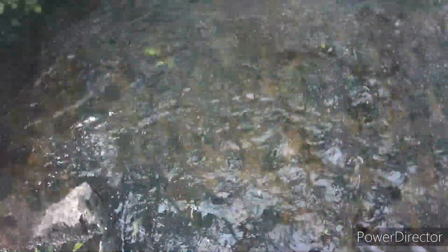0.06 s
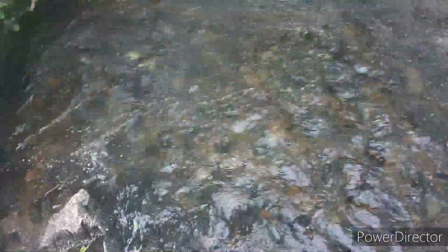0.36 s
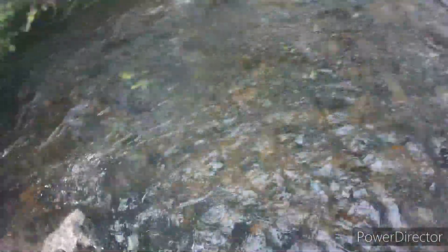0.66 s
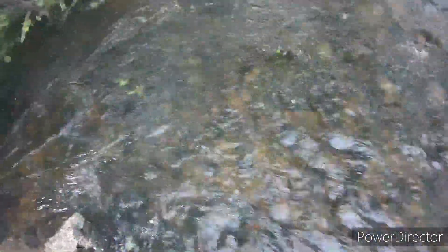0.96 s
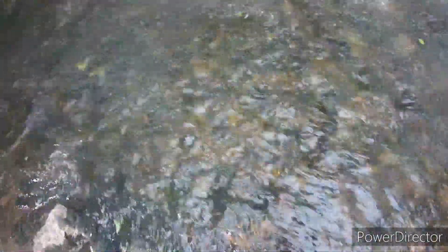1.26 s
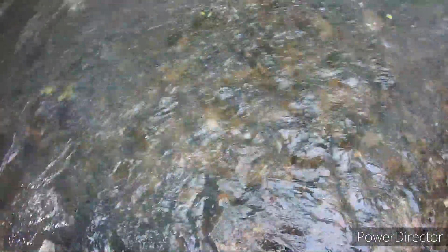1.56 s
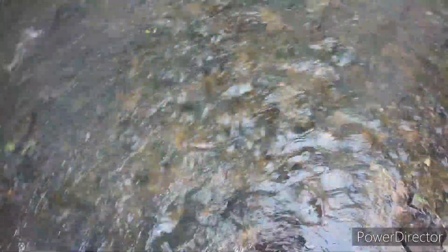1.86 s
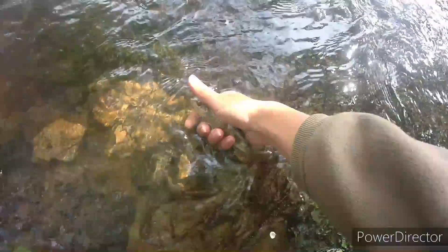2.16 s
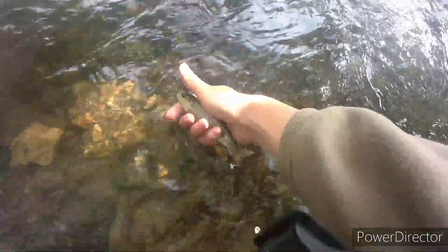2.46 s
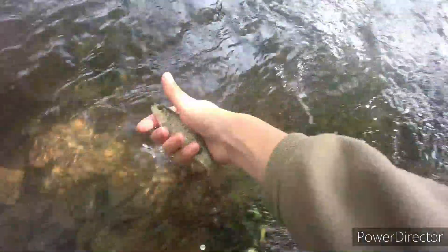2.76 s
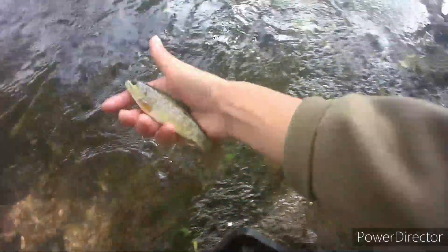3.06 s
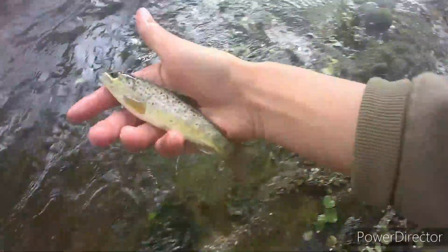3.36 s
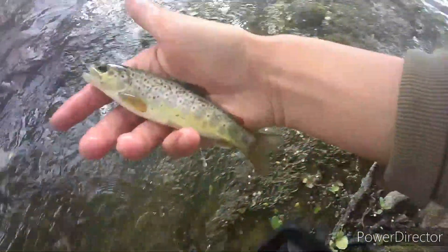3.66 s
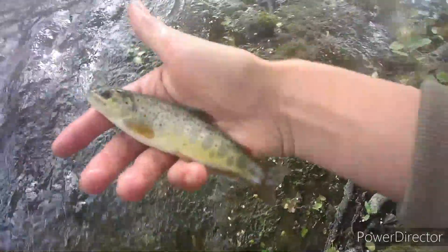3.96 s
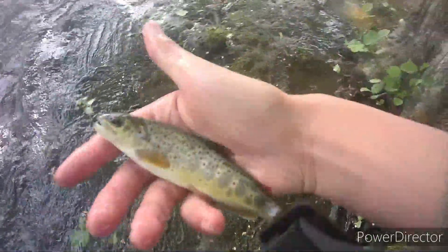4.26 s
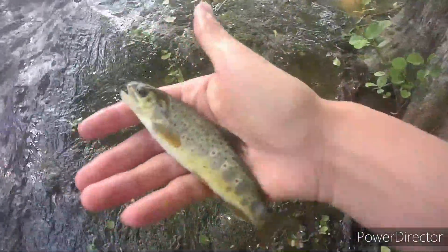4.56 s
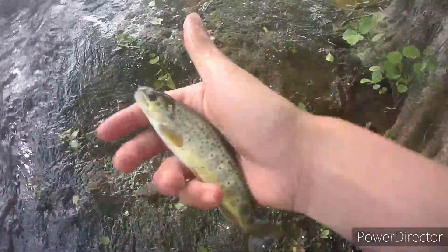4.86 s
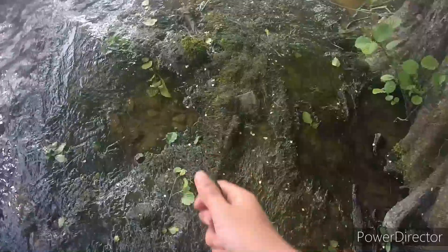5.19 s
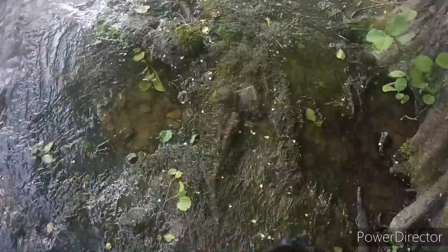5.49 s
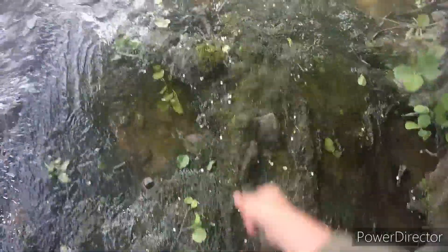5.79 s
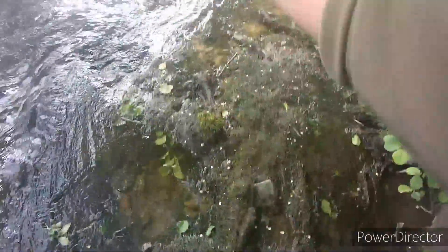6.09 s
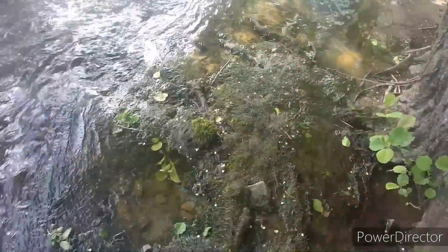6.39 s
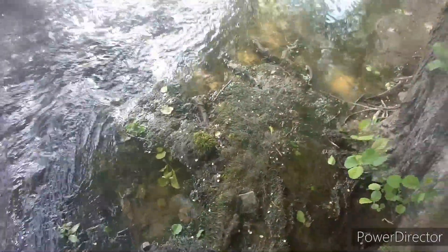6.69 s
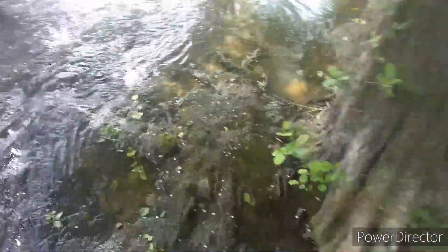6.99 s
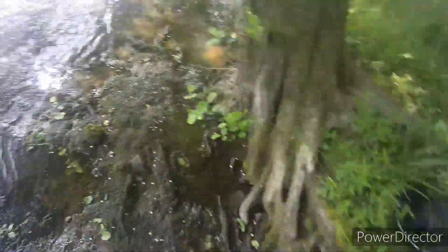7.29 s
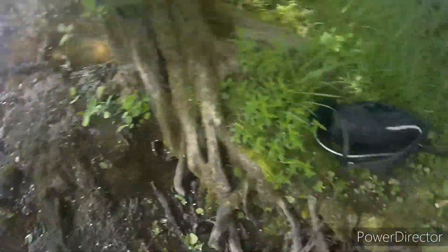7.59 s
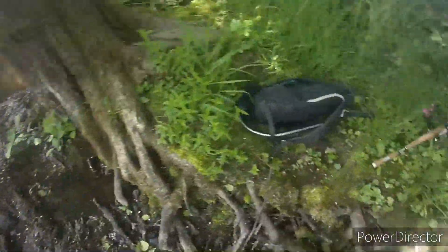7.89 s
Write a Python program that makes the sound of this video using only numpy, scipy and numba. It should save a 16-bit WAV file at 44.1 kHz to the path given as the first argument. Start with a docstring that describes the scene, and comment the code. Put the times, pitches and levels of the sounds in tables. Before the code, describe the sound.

Loud, close knocks and fabric scrapes hit the plastic case of a body-worn microphone, briefly overloading it, while a small buckle rings twice over a low rumble. Behind them a shallow stream runs softly over stones. After a very short dropout, the water continues for several seconds with occasional light brushes of cloth, until another burst of bumps and rubbing closes the scene.

```python
"""A shallow stream runs over stones, heard from a body-worn camera in a plastic case. From the start
the swaying mount rumbles under the water, beside a faint electronic whine. In the first second or so
clothing rubs the case, gear knocks on it and overloads the microphone, and a buckle rings twice.
Just after 2 s the sound drops out briefly. Water and light rubbing follow, until hard knocks and
louder rubbing return from about 7.4 s."""
import sys
import numpy as np
from scipy import signal
from scipy.fft import rfft, irfft, next_fast_len
from scipy.io import wavfile
from scipy.ndimage import uniform_filter1d
from numba import njit

SR = 44100
rng = np.random.default_rng(int(sys.argv[2]) if len(sys.argv) > 2 else 0)


def transcribe(signal):
    """Save signal, clipped to [-1, 1], as a 16-bit WAV file at the path in sys.argv[1]."""
    frames = np.atleast_2d(signal).T
    limited = np.clip(frames, -1, 1)
    pcm = np.round(limited * 32767).astype(np.int16)
    wavfile.write(sys.argv[1], SR, pcm)


N = 358974
TIME = np.arange(N) / SR


def undb(db):
    """Amplitude ratio of a level in decibels."""
    return 10 ** (np.asarray(db) / 20)


def unit(x):
    """Normalisation to rms 1."""
    return x / np.sqrt(np.mean(x ** 2))


def add(out, start_s, x):
    """Superposition: x is added to out from start_s on."""
    i = max(int(start_s * SR), 0)
    out[i:i + len(x)] += x[:max(len(out) - i, 0)]


def colour(x, outline, tilt_db=0):
    """Spectral shaping by an outline (f/Hz, level/dB) and a tilt per octave; rms 1."""
    size = next_fast_len(len(x))
    octave = np.log2(np.maximum(np.fft.rfftfreq(size, 1 / SR), 1))
    hz, db = np.transpose(outline)
    gain = undb(np.interp(octave, np.log2(hz), db) + tilt_db * np.maximum(octave, np.log2(hz[0])))
    return unit(irfft(rfft(x, size) * gain, size)[:len(x)])


def fluctuation(rate):
    """Random modulation: values held for 1 / rate seconds and smoothed twice; rms 1."""
    hold = max(int(SR / rate), 1)
    steps = np.repeat(rng.standard_normal(N // hold + 1), hold)
    return unit(uniform_filter1d(uniform_filter1d(steps, hold), hold)[:N])


def ring(t, hz, t60):
    """Damped oscillation: a sine that falls by 60 dB in t60 seconds."""
    return np.sin(2 * np.pi * hz * t) * np.exp(-np.log(1000) * t / t60)


def clicks(rate, spread_db):
    """Shot noise: on average rate impulses a second, many small and a few large."""
    size = undb(spread_db * np.minimum(rng.exponential(size=N), 5))
    return unit((rng.random(N) < rate / SR) * size * rng.standard_normal(N))


def bubbles(count, low_hz, high_hz, cycles, glide, spread_db):
    """Bubble resonance: trapped air rings briefly and rises in pitch as it nears the surface."""
    out = np.zeros(N)
    for when, pitch, size, life in rng.random((count, 4)):
        hz = low_hz * (high_hz / low_hz) ** pitch
        t60 = cycles * (.5 + life) / hz
        t = TIME[:int(t60 * SR)]
        chirp = ring(t, hz * (1 + glide * t / t60), t60)
        add(out, when * N / SR, undb(-spread_db * np.log(size + .01)) * chirp)
    return unit(out)


def stream():
    """Dense fizz and separate bubbles are filtered by the cavity resonances of the case."""
    # spectrum of the rushing water: f/Hz, spectral level/dB
    rush = [(100, -10.5), (200, -6), (400, -8.5), (700, -7.5), (1020, -1), (1280, -13.5), (1800, -7.5),
            (2600, -19.5), (3200, -15.5), (4300, -21), (7000, -27), (9000, -26), (12000, -33.5),
            (15000, -38.5)]
    # nearness of the riffle: t/s, level/dB, half the treble gain/dB
    riffle = [(0, -46.5, -2), (2.1, -48.5, 0.5), (2.3, -47, 0.5), (3.5, -48, 1), (4.6, -49, 1.5),
              (5.8, -47, 0), (6.8, -48, 0), (7.4, -48.5, 0), (8.14, -40, -5)]
    times, db, half_treble_db = np.transpose(riffle)
    fizz = colour(clicks(rate=9000, spread_db=0.5), rush) * undb(0.9 * fluctuation(rate=14))
    gurgle = bubbles(count=3500, low_hz=422, high_hz=7000, cycles=31, glide=0.063, spread_db=3.0)
    water = unit(fizz + undb(-4) * colour(gurgle, rush, tilt_db=5.0))
    treble = signal.sosfilt(signal.butter(1, 2500, "high", fs=SR, output="sos"), water)
    treble_gain = undb(2 * np.interp(TIME, times, half_treble_db))
    return (water + (treble_gain - 1) * treble) * undb(np.interp(TIME, times, db))


def sway(lift_db=2, uneven_db=2):
    """Structure-borne sound: body movement reaches the microphone through the mount as a rumble."""
    # strength of the sway: t/s, level before the lift/dB
    movement = [(0.0, -54), (0.34, -45.5), (0.88, -34.5), (2.02, -46), (2.13, -51), (2.47, -55),
                (6.87, -50.5), (7.62, -44), (7.8, -38), (8.14, -51)]
    # spectrum of the rumble: f/Hz, spectral level/dB
    spectrum = [(15, -19.5), (35, 1), (55, -1.5), (90, -4), (140, -13.5), (260, -25), (500, -55.5)]
    times, db = np.transpose(movement)
    rumble = colour(rng.standard_normal(N), spectrum)
    return rumble * undb(np.interp(TIME, times, db) + lift_db + uneven_db * fluctuation(rate=12))


def whine(hz=14804, db=-94):
    """A steady electronic oscillation is heard as a faint pure tone."""
    return undb(db) * unit(np.sin(2 * np.pi * hz * TIME))


def cloth(catch_db=2.5):
    """Stick-slip friction: fibres catch and slip on the case in uneven strokes."""
    # strokes: onset t/s, duration/s, level/dB, tilt/(dB per octave), peak position/fraction of stroke
    strokes = [(0.065, 0.13, -38.5, -5, 0.64), (0.306, 0.12, -49, -1, 0.4), (0.502, 0.03, -27.5, -2, 0.25),
               (0.627, 0.039, -18.5, -2, 0.83), (0.751, 0.22, -34, -2.5, 0.64),
               (0.965, 0.11, -31.5, -3.5, .7), (1.055, 0.056, -21, -2, 0.63), (1.102, 0.084, -35, -2, .5),
               (1.194, 0.4, -43, -2, .5), (1.60, 0.072, -43.5, -1.5, .5), (1.843, 0.076, -44.5, 2.5, 0.57),
               (2.07, .08, -42.5, 0.5, 0.3), (2.303, .35, -47.5, -2, .5), (2.66, 0.2, -42, 0.5, 0.39),
               (3.137, 0.22, -45.5, -1, .55), (3.699, 0.17, -48, 2, .6), (4.094, 0.074, -37.5, -0.5, 0.24),
               (4.156, .10, -38.5, -1.5, 0.25), (4.178, 0.22, -48.5, 2, .2),
               (4.459, 0.25, -42.5, -0.5, 0.57), (4.592, 0.068, -39, -0.5, 0.65),
               (6.568, .14, -46.5, -1.5, .5), (6.752, 0.13, -42, -2, 0.42),
               (6.996, 0.16, -36.5, -0.5, 0.09), (7.399, 0.17, -36, -2, 0), (7.674, 0.1, -30.5, -2, 0.52),
               (7.757, .12, -31, -3, 0.44), (7.886, 0.066, -18, -1.5, 0.72), (7.945, .05, -36.5, 0.5, .3),
               (8.017, 0.14, -44, 1, 0.3)]
    # cloth heard through the case: f/Hz, spectral level/dB
    spectrum = [(100, -5.5), (350, -8), (600, -1), (1050, -3), (1300, -7), (1850, -3), (2500, -10),
                (3200, -10.5), (4300, -16), (5200, -25), (9500, -28), (15000, -39.5)]
    out = np.zeros(N)
    slips = clicks(rate=4500, spread_db=2) * undb(catch_db * fluctuation(rate=110))
    for start, length, db, tilt_db, peak in strokes:
        grain = slips[int(start * SR):int((start + length) * SR)]
        progress = np.arange(len(grain)) / (length * SR)
        speed = np.interp(progress, [0, np.clip(peak, .02, .98), 1], [0, 1, 0])
        add(out, start, undb(db) * np.sin(speed * np.pi / 2) * colour(grain, spectrum, tilt_db))
    return out


def knocks(crack_db=-13, crack_t60=0.022, thump_hz=48, thump_t60=0.082, reach_octaves=0.47):
    """Impact excitation: a blow rings the case modes, weighted by the spot struck, and jolts the mount."""
    # blows: t/s, level/dB, contact cutoff f/Hz, favoured f/Hz, its boost/dB, relative thump level/dB
    blows = [(0.0692, -14, 1700, 650, 1.5, -14.5), (0.4869, 4.5, 2300, 560, -1, -8),
             (0.5443, -1, 3800, 1850, 6, -16), (0.6555, -5.5, 4200, 1650, 7.5, -24),
             (0.7050, -21, 1500, 300, -4, 4), (0.7147, -13.5, 1800, 1050, 4.5, 9.5),
             (0.7770, -11.5, 2000, 1050, 6.5, -20), (0.8140, -22, 1500, 1000, 14, -14),
             (0.8820, -9, 1300, 1040, 8, -8), (0.895, -20, 1500, 650, 11, 1),
             (0.9052, -19.5, 2200, 1900, 8, 8), (0.9669, -19.5, 3800, 1310, 13, -4),
             (1.0330, -19.5, 1500, 605, 14, -11), (1.0602, -4, 1900, 810, 7, 1.5),
             (1.0816, -6, 1600, 810, 14.5, -3), (1.0985, 2, 3400, 2540, 6, -9),
             (1.1180, -27, 2600, 1500, 6, -9), (1.16, 6, 4000, 506, 4.5, -25),
             (1.188, -20, 1800, 1400, 0, -14), (1.2043, -18.5, 1100, 950, 18.5, -16),
             (1.9047, -8.5, 1300, 1010, 14.5, -17), (2.1390, -22, 1400, 974, 17, -9),
             (4.0964, -22.5, 1300, 560, 13, -22.5), (4.6110, -24.5, 6000, 1900, 2, -20),
             (7.3972, -6, 1600, 525, 14, -20.5), (7.6024, -6, 4000, 1820, 4.5, -17),
             (7.854, -7, 2700, 1010, 11, -20), (7.8636, -7, 3600, 3640, 12.5, -22),
             (7.8677, -6.5, 1400, 920, 17.5, -24), (7.9453, 2.5, 3200, 1490, 5.5, -5),
             (7.9790, 4, 5500, 760, 5.5, -31)]
    # modes of the case: f/Hz, level/dB, decay time T60/s
    case_modes = [(161, -12, 0.028), (325, -12.5, 0.027), (474, -16, 0.046), (615, -13.5, 0.031),
                  (810, -12.5, 0.031), (1000, -13, 0.034), (1400, -10.5, 0.015), (1700, -11, 0.019),
                  (1983, -12.5, .025), (2730, -12.5, 0.013), (3200, -12.5, 0.015), (4115, -15, 0.014),
                  (4830, -23.5, 0.0095), (5860, -14, 0.012), (7480, -12, 0.0086), (8880, -8.5, .008),
                  (11380, -11, .007)]
    out, t = np.zeros(N), TIME[:SR // 6]
    hz, mode_db, t60 = np.transpose(case_modes)
    modes = np.array([(-1) ** k * ring(t, hz[k], t60[k]) for k in range(len(hz))])
    for start, db, cutoff_hz, spot_hz, boost_db, thump_db in blows:
        spot_db = boost_db * np.exp(-(np.log2(hz / spot_hz) / reach_octaves) ** 2)
        ringing = undb(mode_db + spot_db) @ modes
        crack = undb(crack_db) * rng.standard_normal(len(t)) * np.exp(-np.log(1000) * t / crack_t60)
        thump = undb(thump_db) * ring(t, thump_hz, thump_t60)
        # a softer contact pushes for longer and leaves out the treble
        contact = signal.butter(2, cutoff_hz, fs=SR, output="sos")
        add(out, start, undb(db) * signal.sosfilt(contact, ringing + crack + thump))
    return out


def buckle():
    """Free vibration: a small metal part, struck or dragged, rings in its inharmonic modes."""
    # strikes: t/s, level/dB, build-up time/s, gain of the lowest mode/dB
    strikes = [(0.5450, -9, .002, -34), (0.6440, -7.5, .012, 4)]
    # modes of the buckle: f/Hz, level/dB, decay time T60/s
    modes = [(577, -1, .11), (1906, 0, 0.085), (2439, -27, .22), (2690, -16, 0.059), (3072, -29, 0.17)]
    out, t = np.zeros(N), TIME[:SR // 4]
    for start, db, build_s, lowest_db in strikes:
        tone = sum(undb(mode_db + lowest_db * (k == 0)) * ring(t, hz, t60)
                   for k, (hz, mode_db, t60) in enumerate(modes))
        add(out, start, undb(db) * tone * (1 - np.exp(-t / build_s)))
    return out


@njit
def follow(x, attack_s, release_s):
    """Envelope detection: the rectified signal is smoothed with separate rise and fall times."""
    out, envelope = np.empty(len(x)), 0.
    for i in range(len(x)):
        lag_s = attack_s if abs(x[i]) > envelope else release_s
        envelope += (abs(x[i]) - envelope) / (SR * lag_s)
        out[i] = envelope
    return out


def scene():
    """Water, handling noise and whine superpose at one microphone."""
    return (stream() + sway() + whine() + cloth() + knocks() + buckle())[None]


def record(dry, limit_db=-9, attack_s=.003, release_s=.05, dropout_s=(2.157, 2.266), top_hz=15300):
    """Limiting and overload: hard knocks duck the gain and clip; a dropout and a low-pass follow."""
    gain = 1 / np.maximum(follow(dry[0], attack_s, release_s) / undb(limit_db), 1)
    clipped = np.clip(dry * gain, -1, 1)
    audible = (TIME < dropout_s[0]) | (TIME > dropout_s[1])
    low_pass = signal.ellip(8, .2, 70, top_hz, fs=SR, output="sos")
    return signal.sosfilt(low_pass, clipped * audible)


dry = scene()
out = record(dry)
transcribe(out)
```